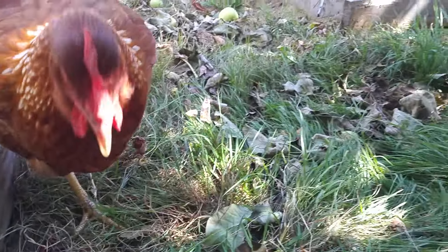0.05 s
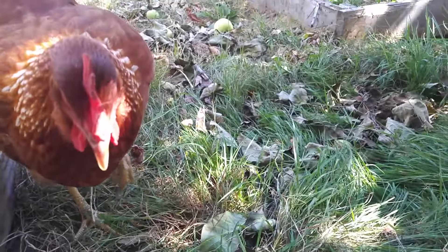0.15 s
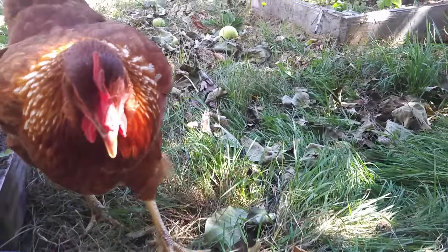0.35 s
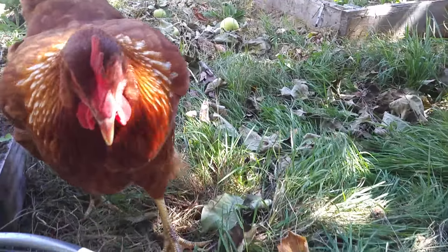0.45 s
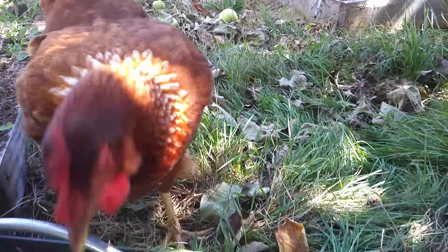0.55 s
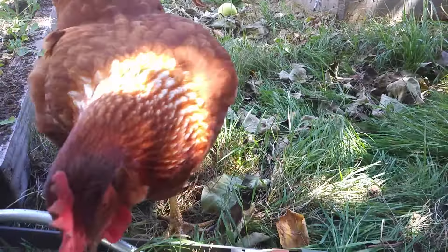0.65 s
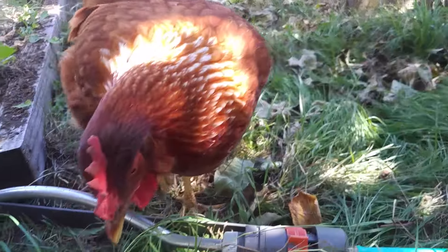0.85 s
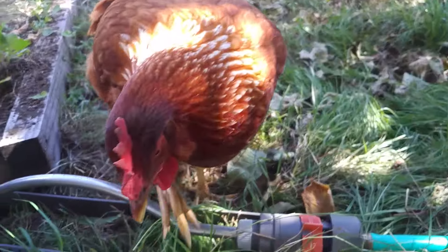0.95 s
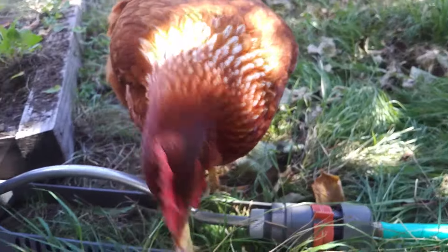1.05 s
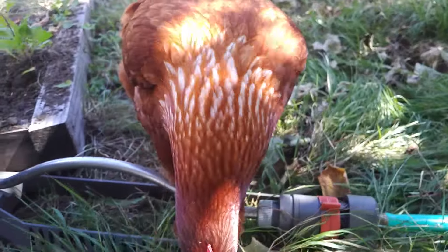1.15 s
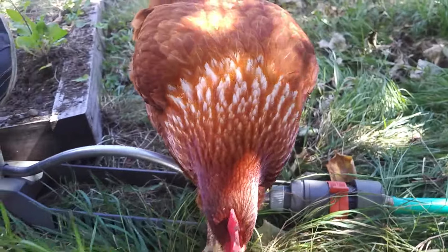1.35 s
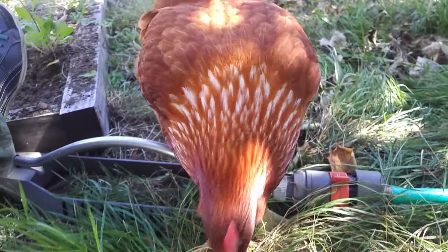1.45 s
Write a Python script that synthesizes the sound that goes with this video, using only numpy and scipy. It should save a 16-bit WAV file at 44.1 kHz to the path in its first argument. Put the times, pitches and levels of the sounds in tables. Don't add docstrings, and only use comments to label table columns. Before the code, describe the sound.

Close outdoor stereo pickup of brittle leaves crunching and snapping around a softly clucking hen, faint steps first, sharp crackles in the middle, a light grassy swish last, over low hiss and distant rumble.

```python
import sys
import numpy as np
from scipy import signal
from scipy.fft import rfft, irfft, next_fast_len
from scipy.io import wavfile
from scipy.ndimage import uniform_filter1d, map_coordinates

SR = 44100
rng = np.random.default_rng(int(sys.argv[2]) if len(sys.argv) > 2 else 0)


def put_to_file(sound):
    columns = np.atleast_2d(sound).T
    safe = np.clip(columns, -1, 1)
    whole_steps = np.round(safe * 32767)
    wavfile.write(sys.argv[1], SR, whole_steps.astype(np.int16))


def gain_from_db(level_db):
    decades = np.asarray(level_db, float) / 20
    return 10 ** decades


N = 66150

# frequency in Hz, density in dB per Hz.
RUMBLE_COLOUR = [(30, -41), (60, 4), (130, -3), (220, -12), (450, -19.5), (900, -17.5), (1800, -24.5),
                 (5000, -35)]
# frequency in Hz, rate of wander in knots per second, level in dB.
HUM_LINES = [(64, 12, -67), (129, 5, -70), (463, 5, -80), (777, 3, -74)]
# peak time in seconds, rise in
# seconds, fall in seconds, level in dB, crackle share from 0 to 1.
STIRRINGS = [
    (0.251, 0.74, 0.9, -63, 0.67),
    (0.513, 0.06, 0.18, -49, 0.68),
    (0.559, 0.075, 0.19, -44.5, .7),
    (0.629, 0.24, 0.085, -54, 0.46),
    (.81, 0.15, 0.36, -61, 0.77),
    (1.229, 0.068, 0.29, -56, 0.24),
    (1.288, 0.24, 0.17, -56, 0),
    (1.45, 0.25, 0.25, -69.5, 1),
]
# frequency in Hz, gain in dB.
LEAF_COLOUR = [(500, -33), (1500, -53), (3000, -4.5), (5000, -1), (10000, -1), (16000, -9.5)]
# frequency in Hz, gain in dB.
BODY_COLOUR = [(500, -79), (800, -11.5), (1300, -9.5), (2500, -6.5), (4500, -8), (7000, -15.5)]
# frequency in Hz, gain in dB.
GRASS_COLOUR = [(500, -38), (1200, -1.5), (2500, 3.5), (5000, -2.5), (10000, -2), (16000, -5.5)]
CRUNCH_S = [.405, .4566, .4997, .5064, .5422, .553, .7003, .8245, .9038]
# peak in dB, length in seconds, low body in dB.
CRUNCHES = [
    (-38.5, 0.0083, -7.5),
    (-12.5, 0.0032, -5.5),
    (-13, 0.0048, -22),
    (-16, 0.0051, -31),
    (-13.5, 0.0018, -10.5),
    (-28, 0.0068, -29),
    (-26.5, 0.0028, -14),
    (-30.5, 0.0033, -20),
    (-23.5, 0.0014, -11.5),
]
SNAP_S = [.09, .313, .355, .5594, .5704, .5864, .605, .6084, .6274, .6374, .6524, .6569, .6634, .6734,
          .6764, .6897, .7054, .7218, .7265, .7447, .7976, .8014, .8324, .8565, .8964, .9164, .9254, 1.1069,
          1.1278]
SNAP_DB = [-50, -59, -49, -25, -34, -31, -30, -45, -48, -52, -35, -32, -45, -29, -33.5, -28, -48, -37.5,
           -43, -43, -40.5, -38, -29, -42, -41, -46, -37, -48, -46.5]
# time in seconds, level in dB, centre frequency in Hz.
FOOTFALLS = [
    (0.032, -52.5, 240),
    (0.139, -57.5, 645),
    (0.201, -61.5, 537),
]
# start in seconds, length in seconds, level in dB, settled pitch in Hz, fundamental in dB
CLUCKS = [
    (.226, 0.054, -31, 443.1, -9.5),
    (.383, 0.051, -36.5, 466, -3.5),
    (0.559, 0.034, -39.5, 469.3, 0.5),
]
UPPER_DB = [-1, -15, -18.5, -40, -39, -40, -48, -39.5, -42, -50]
# time in seconds, level in dB.
CREAKS = [
    (.3716, -40),
    (.3758, -36.5),
    (0.377, -48),
    (0.3813, -46),
    (.3845, -59),
    (0.55, -49),
    (0.5529, -54),
    (.557, -43.5),
]
# frequency in Hz, width in Hz, level in dB.
THROAT = [(296, 310, 10), (650, 340, 6), (920, 95, 1.5), (1230, 150, -13)]
# frequency in Hz, gain in dB.
RIGHT_LOW = [(2000, 0)]
# frequency in Hz, gain in dB.
RIGHT_HIGH = [(3000, 1.5), (4200, 2), (5500, 11.5), (6400, 17.5), (7500, 10), (10000, 1), (15000, -3)]
# frequency in Hz, gain in dB.
LEFT_LOW = [(60, -36), (450, -28), (900, -21), (1400, -14)]
# frequency in Hz, gain in dB.
LEFT_HIGH = [(2400, -18.5), (4150, -2.5), (5400, -18.5), (8000, -3.5), (9500, -10.5), (15000, -8)]
# frequency in Hz, density in dB per Hz.
HISS_COLOUR = [(30, -1), (300, 0), (1000, -6), (2000, -1.5), (10000, -5), (16000, -7)]
HISS_DB = [-66.5, -65.5]
WHINE_DB = [-79, -74]


def unit(x):
    return x / np.sqrt(np.mean(x ** 2, axis=-1, keepdims=True) + 1e-20)


def along(points, hz):
    f, v = np.transpose(points)
    return np.interp(np.log(hz + 1), np.log(f + 1), v)


def wobble(rate):
    knots = rng.standard_normal(int(N * rate / SR) + 4)
    return map_coordinates(knots, [np.arange(N) * rate / SR])


def filtered(x, response):
    m = next_fast_len(N + SR // 2)
    return irfft(rfft(x, m) * response(np.fft.rfftfreq(m, 1 / SR)), m)[..., :N]


def coloured(x, points):
    def response(hz):
        cepstrum = irfft(np.log(gain_from_db(along(points, hz))))
        half = len(cepstrum) // 2
        cepstrum[1:half] *= 2
        cepstrum[half + 1:] = 0
        return np.exp(rfft(cepstrum))
    return filtered(x, response)


def echo(x, t60):
    t = np.arange(SR // 4) / SR
    tail = rng.standard_normal(len(t)) * gain_from_db(-60 * t / t60)
    return signal.fftconvolve(x, tail[None] / np.linalg.norm(tail), axes=1)[:, :N]


def distance():
    swell = gain_from_db(-58.5 + 1.6 * wobble(7.85))
    out = swell * unit(coloured(rng.standard_normal(N), RUMBLE_COLOUR + [(20000, -59)]))
    t = np.arange(N) / SR
    for hz, rate, db in HUM_LINES:
        level = gain_from_db(db + 4 + 3 * wobble(rate))
        out += level * np.sin(2 * np.pi * hz * t + 2.0 * wobble(rate))
    return out


def stirring():
    t = np.arange(N) / SR
    crackle, swish = np.zeros(N), np.zeros(N)
    for peak, rise, fall, db, share in STIRRINGS:
        away = np.maximum((peak - t) / rise, (t - peak) / fall)
        power = gain_from_db(2 * db - 50.7 * away ** 1.245)
        share = np.clip(share, 0, 1)
        crackle += power * share
        swish += power * (1 - share)
    return crackle, swish


def grass_swish():
    strength = np.sqrt(stirring()[1]) * gain_from_db(1.5 * wobble(39.73))
    return coloured(strength * rng.standard_normal((2, N)), GRASS_COLOUR)


def fine_crackle():
    grains_per_s, size_spread_db, breeze_db = 3300, 12.5, -80.5
    breaks = rng.random(N) < grains_per_s / SR
    size_db = size_spread_db * rng.standard_normal(N) / 2 + 1.6 * wobble(90.1)
    sizes = breaks * gain_from_db(np.minimum(size_db, 7))
    grains = unit(uniform_filter1d(sizes, size=5) * rng.standard_normal((2, N)))
    breeze = gain_from_db(breeze_db + 2.1 * wobble(38)) * rng.standard_normal((2, N))
    return np.sqrt(stirring()[0]) * grains + breeze


def snaps_and_crunches():
    edges, body = np.zeros((2, N + SR)), np.zeros((2, N + SR))
    t = np.arange(SR // 40) / SR
    events = [(s, *crunch) for s, crunch in zip(CRUNCH_S, CRUNCHES)]
    events += [(s, db + 8, .0007, -20) for s, db in zip(SNAP_S, SNAP_DB)]
    for start, peak_db, length, body_db in events:
        edge_noise, body_noise, lumps = rng.standard_normal((3, 2, len(t)))
        shape = np.minimum(t / (0.32 * length), 1) * gain_from_db(-16 * np.clip(t / length - .7, 0, None))
        cluster = shape * edge_noise * gain_from_db(3.0 * unit(uniform_filter1d(lumps[0], size=14)))
        cluster *= np.linalg.norm(shape) / np.linalg.norm(cluster, axis=1, keepdims=True)
        first = round(start * SR)
        span = slice(first, first + len(t))
        edges[:, span] += gain_from_db(peak_db - 15.5) * cluster
        body[:, span] += gain_from_db(peak_db + body_db) * shape ** 0.54 * body_noise
    return edges[:, :N], body[:, :N]


def leaves():
    apart = 1
    crackle = fine_crackle()
    swish = grass_swish()
    edges, body = snaps_and_crunches()
    right, other = coloured(crackle + edges, LEAF_COLOUR) + coloured(body, BODY_COLOUR) + swish
    return np.array([np.cos(apart) * right + np.sin(apart) * other, right])


def footfalls():
    t = np.arange(N) / SR
    out = np.zeros(N)
    for s, db, hz in FOOTFALLS:
        band = lambda f: np.exp(-np.log(f / hz + 1e-6) ** 2 / 0.19)
        out += gain_from_db(db - 910 * np.abs(t - s)) * unit(filtered(rng.standard_normal(N), band))
    return out


def creaks():
    slaps = np.zeros(N)
    for s, db in CREAKS:
        slaps[round(s * SR)] = gain_from_db(db + 21)

    def throat(f):
        modes = sum(gain_from_db(db) * 1j * f * w / (c * c - f * f + 1j * f * w) for c, w, db in THROAT)
        return modes / (1 + (f / 1400) ** 10)
    return filtered(slaps, throat)


def clucks():
    attack_s, release_s, bloom_s = 0.022, 0.009, .005
    start_high, settle_s, waver = .42, .012, 0.0085
    swell_db, late_db, fade_first, partial_lag = 33, 2.7, .5, .45
    out = np.zeros(N)
    for s, length, db, hz, first_db in CLUCKS:
        t = np.arange(N) / SR - s
        fall_db = 15 * (np.clip(t - length + release_s, 0, 1) / release_s) ** 2
        glide = start_high * np.exp(-np.clip(t, 0, 1) / settle_s)
        phase = 2 * np.pi * np.cumsum(hz * (1 + glide + waver * wobble(62.1))) / SR
        for k, level in enumerate([first_db] + UPPER_DB):
            late = np.clip(k - 1, -.6, 2)
            before_full = np.clip(1 - (t - bloom_s * late) / attack_s, 0, 9)
            rise_db = (swell_db + late_db * late) * before_full ** 2
            level_db = db + level + 2.5 - rise_db - fall_db * (1.5 + fade_first * late)
            out += gain_from_db(level_db) * np.cos((k + 1) * phase - partial_lag * k ** 2)
    return out


def scene():
    near = clucks() + creaks() + footfalls() + leaves()
    air = near + gain_from_db(-24) * echo(near, .14) + distance()
    lag_s = .0002
    scattered = air + gain_from_db(-16) * echo(air, .004)
    covered = filtered(scattered, lambda hz: np.exp(-2j * np.pi * hz * lag_s))
    return np.array([covered[0], air[1]])


def band_limit(x):
    return signal.sosfilt(signal.butter(12, 16570, fs=SR, output="sos"), x)


def record(dry):
    left = coloured(dry[0], LEFT_LOW + LEFT_HIGH)
    right = coloured(dry[1], RIGHT_LOW + RIGHT_HIGH)
    hiss = gain_from_db(HISS_DB)[:, None] * unit(coloured(rng.standard_normal((2, N)), HISS_COLOUR))
    whine_phase = 2 * np.pi * 13500 * np.arange(N) / SR + 0.24 * wobble(7.5)
    whine = gain_from_db(WHINE_DB)[:, None] * np.sin(whine_phase)

    def limit(hz):
        top_hz, end_hz = 15750, 16600
        slope = gain_from_db(-12 * (4 + (hz - top_hz) / (end_hz - top_hz)))
        return np.where(hz < top_hz, 1, slope * (hz < end_hz))
    offset = -0.00038
    return band_limit(filtered(np.array([left, right]) + hiss + whine, limit) + offset)


dry = scene()
out = record(dry)
put_to_file(out)
```